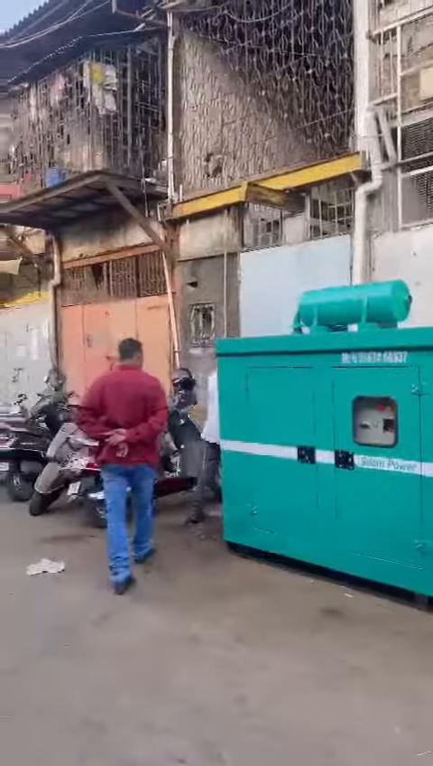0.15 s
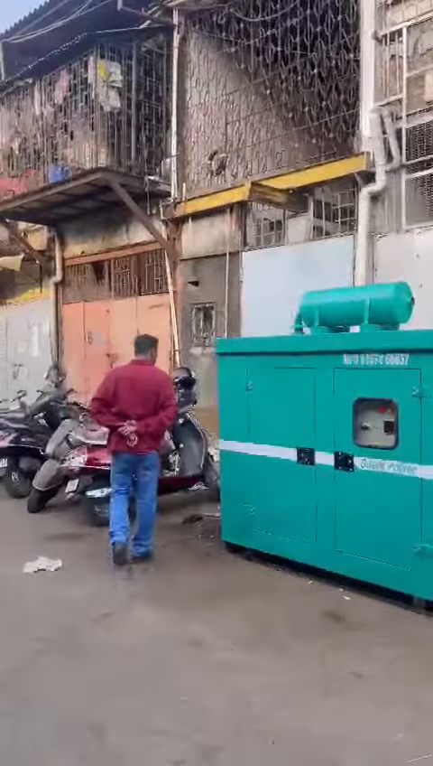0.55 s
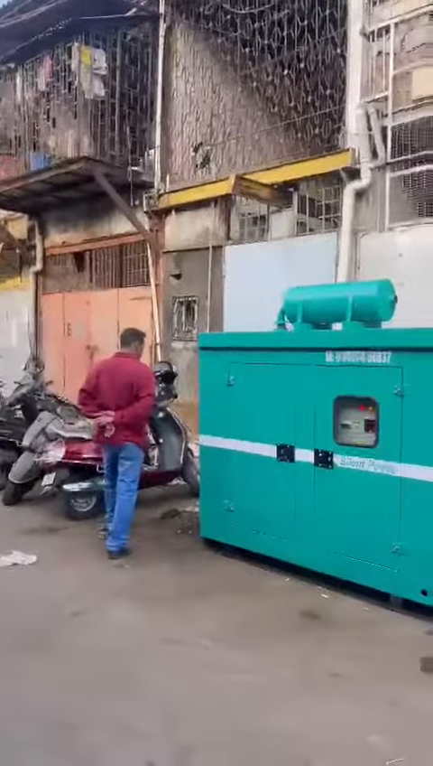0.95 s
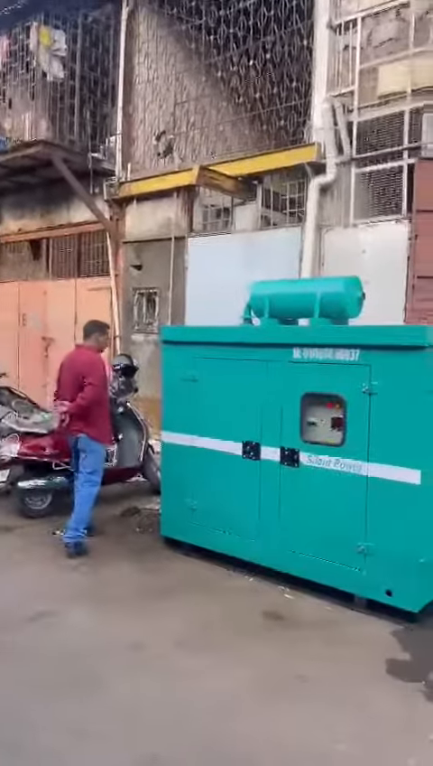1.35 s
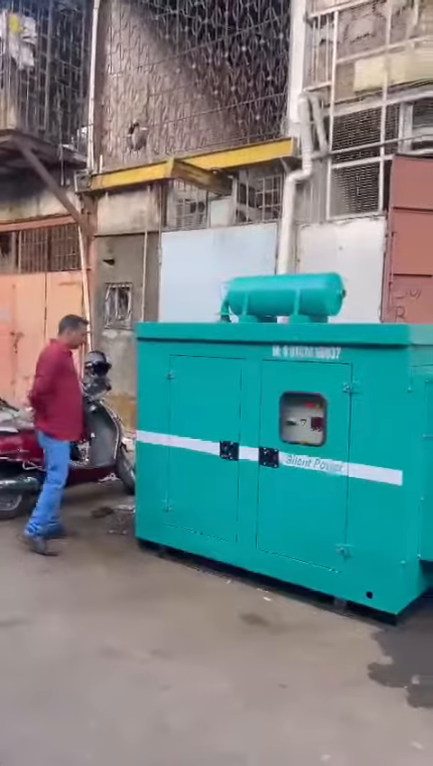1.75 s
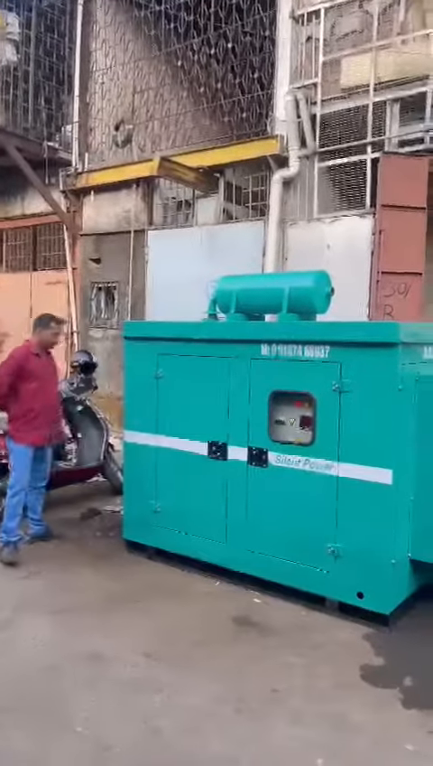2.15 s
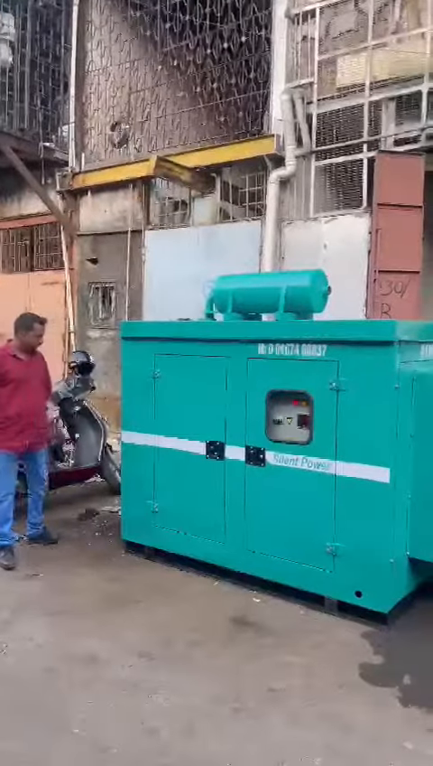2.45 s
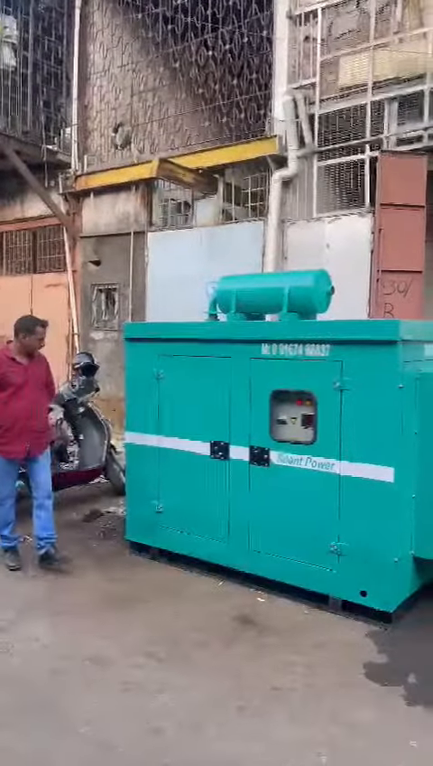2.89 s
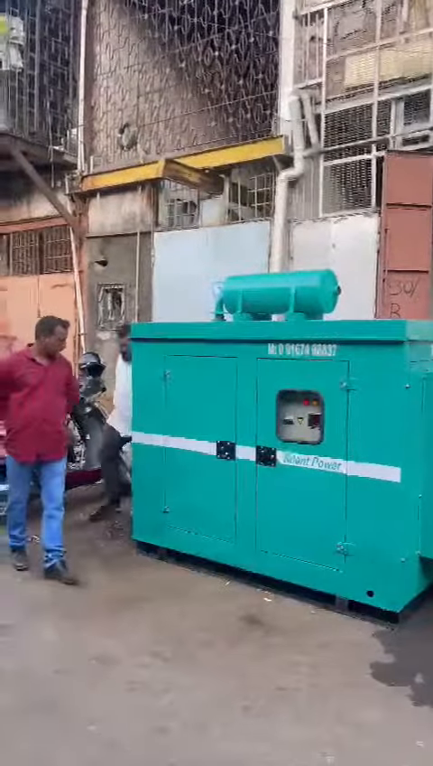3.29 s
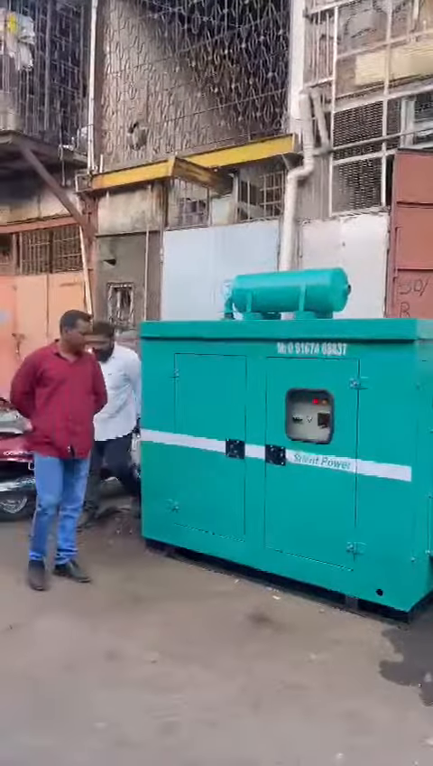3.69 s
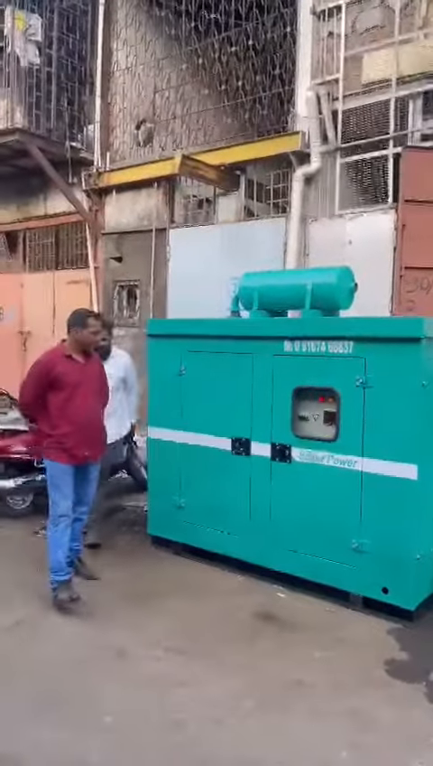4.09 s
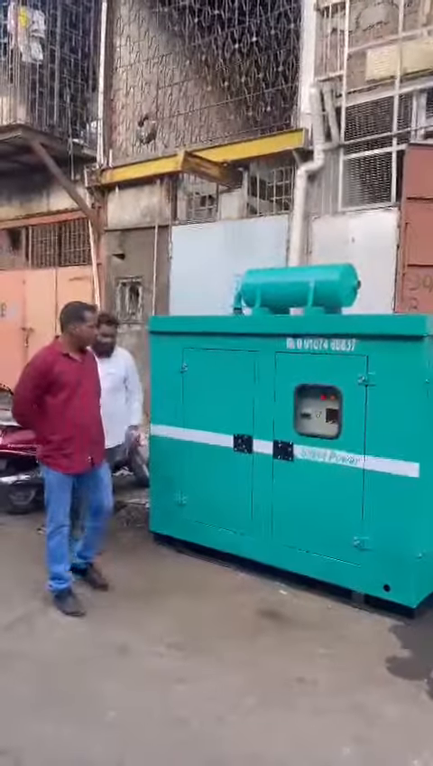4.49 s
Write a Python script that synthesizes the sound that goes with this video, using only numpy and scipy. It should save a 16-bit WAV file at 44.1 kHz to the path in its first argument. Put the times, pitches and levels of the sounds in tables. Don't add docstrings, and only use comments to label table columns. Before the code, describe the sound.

A boxed diesel generator drones a few metres away in an open lane, a low throbbing hum with ringing steel panels, soft clatter and cooling-air hiss. Short gusts thump the phone's microphone, and a thin high whine from afar swells and fades. At about three and a half seconds the engine is shut off; the hum slides down and weakens until the end.

```python
import sys
import numpy as np
from scipy import signal
from scipy.fft import rfft, irfft
from scipy.io import wavfile
from scipy.ndimage import uniform_filter1d

SR = 44100
rng = np.random.default_rng(int(sys.argv[2]) if len(sys.argv) > 2 else 0)


def generate_wav(signal):
    frames = np.transpose(np.atleast_2d(signal))
    scaled = np.clip(frames, -1, 1) * 32767
    pcm = np.round(scaled).astype(np.int16)
    wavfile.write(sys.argv[1], SR, pcm)


def field_ratio(decibels):
    return 10 ** (np.asarray(decibels, dtype=float) / 20)


N = 204303
TIME = np.arange(N) / SR
HZ = np.maximum(np.arange(N // 2 + 1) * SR / N, 1)
CUT_S = 3.46
GOVERNED_HZ = 49.4


def along(table, column):
    rows = np.array(table)
    return np.interp(np.log(HZ), np.log(rows[:, 0]), rows[:, column])


def unit(x):
    return x / np.sqrt(np.mean(x ** 2))


def walk(rate):
    hold = int(SR / rate)
    x = np.repeat(rng.standard_normal(N // hold + 1), hold)
    x = uniform_filter1d(uniform_filter1d(x, hold), hold)[:N]
    return x / x.std()


def bumps(table):
    return sum(db * np.exp(-((TIME - s) / half_width) ** 2) for s, db, half_width in table)


def switch(at_s, rise_s):
    return .5 + .5 * np.tanh((TIME - at_s) / rise_s)


def pair(gain, alike, turns=0, gate=1):
    shared, separate = rfft(gate * rng.standard_normal((2, N)))
    alike = np.clip(alike, -1, 1)
    right = alike * shared * np.exp(-1j * np.pi * turns) + np.sqrt(1 - alike ** 2) * separate
    return unit(irfft(gain * np.array([shared, right]), N))


def pan(x, db):
    return x * field_ratio(np.array([[db / 2], [-db / 2]]))


# frequency in Hz, level in dB per Hz.
WIND_COLOUR = [(12, -54.5), (28, -6.5), (55, 3), (120, 3.5), (260, -12.5), (500, -27), (900, -51)]
# time in seconds, level in dB over the breeze, half width in seconds.
GUST_TIMES = [(.75, 8, .25), (1.5, 18, 0.069), (1.82, 12.5, 0.065), (2.0, 13, 0.18), (2.55, 13, 0.12),
              (2.95, 8.5, .1), (3.23, 7.5, 0.1), (3.57, 8, 0.032), (3.72, 3.5, 0.026), (3.82, 2, 0.036),
              (4.04, 1.5, 0.035), (4.27, 4, .03), (4.52, 6.5, 0.051)]
# time in seconds, level change in dB, half width in seconds.
BACKGROUND_LULLS = [
    (4.46, -8, .022),
]


def wind():
    puffs = field_ratio(np.array([3.5 * walk(30), 3.5 * walk(30)]))
    breeze_db = -43 + 16 * switch(at_s=3.03, rise_s=0.24)
    gust_db = breeze_db + bumps(GUST_TIMES) + bumps(BACKGROUND_LULLS)
    return pair(field_ratio(along(WIND_COLOUR, 1)), 0, gate=puffs) * field_ratio(gust_db + np.array([[-1.5], [4.5]]))


# time in seconds, whine in Hz.
WHINE_PITCH = [(0, 5215), (.45, 5182), (.78, 5112), (.95, 5100), (1.2, 5110), (1.35, 5092), (1.47, 4975),
               (1.78, 5180), (2.1, 5270), (2.35, 5250), (2.55, 5298), (2.72, 5365), (2.86, 5360),
               (3.25, 5270), (3.45, 5247), (3.9, 5267), (4.22, 5260), (4.63, 5215)]
# start in seconds, length in seconds, level in dB.
ECHO_SWELLS = [(-.03, 0.23, -45.5), (.34, 0.049, -62), (0.508, 0.048, -53), (.64, 0.028, -48),
               (0.743, 0.02, -48.5), (0.85, 0.13, -46.5), (1.165, 0.16, -43), (1.396, .02, -49),
               (1.464, .02, -51), (1.59, 0.034, -48), (1.693, 0.12, -44), (1.905, 0.047, -42.5),
               (2.03, 0.17, -42), (2.35, .03, -50), (2.43, 0.045, -43.5), (2.503, 0.071, -46),
               (2.606, 0.27, -36), (2.938, 0.11, -37), (3.107, 0.047, -38.5), (3.209, 0.041, -43),
               (3.294, 0.13, -44), (3.47, 0.027, -50), (3.592, 0.27, -41), (4.008, .24, -40.5),
               (4.3, 0.043, -48.5), (4.47, 0.054, -51)]


def whine():
    pitch = np.interp(TIME, *np.transpose(WHINE_PITCH)) + 2.5 * walk(30)
    phase = 2 * np.pi * np.cumsum(pitch) / SR
    edge_s, arch = 0.027, 2.26
    size = field_ratio(-55.5)
    for start_s, length_s, db in ECHO_SWELLS:
        across = (TIME - start_s - length_s / 2) / (length_s / 2 + edge_s)
        size = size + field_ratio(db) * np.clip(1 - across ** 2, 0, 1) ** (1 / arch)
    pan_db = -3.5 + 0.5 * TIME
    flutter = field_ratio(1.5 * np.array([walk(28), walk(28)]) + 2.2 * walk(45))
    tones = np.array([np.sin(phase), np.sin(phase + 1.15 + .3 * walk(4.9))])
    return np.sqrt(2) * size * flutter * field_ratio(np.array([pan_db, -pan_db]) / 2) * tones


def layer_db(law, step, speed):
    steady_db, step_db, cut_db, halving_db = law
    return steady_db + step_db * step + cut_db * switch(at_s=3.51, rise_s=0.12) - halving_db * np.log2(speed)


# frequency in Hz, level in dB per Hz.
HISS_COLOUR = [(1500, -12), (3000, -14.5), (4500, 3.5), (6000, -3), (7500, -3), (9000, -1.9), (10500, -1),
               (11300, -3.5), (11750, -10.5), (11900, -43)]
# frequency in Hz, half turns the right port lags, likeness of the ports 0 to 1.
HISS_DELAY = [(3000, -.5, .3), (4000, .5, .5), (4550, .95, .8), (5050, 1.08, .87), (5400, 1.7, .95),
              (6150, 2, .99), (7250, 2.5, .99), (8000, 2.85, .99), (8950, 3, .99), (10000, 3.15, .99),
              (10750, 3.5, .99), (11700, 4, .99)]
# steady level in dB, dB gained by the sideways step, dB added at the cut, dB gained per halving of
HISS_LEVEL = (-46, 0.17, -1.5, -0.5)


def louvres(step, speed):
    hiss = pair(field_ratio(along(HISS_COLOUR, 1)), along(HISS_DELAY, 2), along(HISS_DELAY, 1))
    return hiss * field_ratio(layer_db(HISS_LEVEL, step, speed) + 8 + 0.69 * walk(10))


# frequency in Hz, likeness (-1 to 1).
PORT_LIKENESS = [(50, 0.81), (250, 0.98), (380, 0.48), (550, -.1), (1400, 0.06), (1800, 0.32), (2300, 0.16),
                 (4000, -.1)]
# frequency in Hz, level in dB per Hz.
RUMBLE_COLOUR = [(15, -34.5), (30, 15.5), (45, -7), (70, -1.5), (130, -4), (240, -1), (320, -8.5),
                 (450, -11.5), (700, -50.5)]
CLATTER_COLOUR = [(300, -39), (500, 1), (780, -1.5), (915, -3), (1080, -2.5), (1330, -4.5), (1800, -8.5),
                  (3000, -10), (4500, -20), (6000, -36)]
# frequency in Hz, width in Hz, level in dB.
PANEL_RINGS = [(353.7, 18, -1), (502, 25, -9.5), (605, 13.7, -0.5), (636.3, 18, 0.3), (923, 23, -6.5),
               (1324, 63, -12), (1486, 102, -16)]
# steady level in dB, dB gained by the sideways step, dB added at the cut, dB gained per halving of
RUMBLE_LEVEL = (-23, -1, -1, -2.5)
PANEL_LEVEL = (-31, -2, 0.5, -10)
CLATTER_LEVEL = (-36.5, 2.5, -4.5, 1)
# time in seconds, level in dB, half width in seconds.
RUMBLE_SWELLS = [
    (0.457, 9, 0.033),
    (1.77, -3.5, 0.1),
    (1.6, -2.5, .08),
    (.36, -6.5, 0.11),
    (0.088, -1.5, 0.073),
]
PANEL_SWELLS = [
    (1.55, 5.5, 0.57),
    (2.88, 4, 0.19),
    (3.55, 0.5, 0.049),
]
CLATTER_SWELLS = [
    (3.22, 1.5, 0.25),
    (1.83, 1.5, 0.09),
]


def casing(phase, step, speed):
    rumble_db = layer_db(RUMBLE_LEVEL, step, speed) + bumps(RUMBLE_SWELLS) + bumps(BACKGROUND_LULLS)
    panel_db = layer_db(PANEL_LEVEL, step, speed) + bumps(PANEL_SWELLS)
    clatter_db = layer_db(CLATTER_LEVEL, step, speed) + bumps(CLATTER_SWELLS)
    beat = 1 + .06 * np.cos(phase) + .12 * np.cos(phase / 4) + .07 * np.cos(phase / 2)
    alike = along(PORT_LIKENESS, 1)
    rings = sum(field_ratio(db) / np.abs(1 + 2j * (HZ - f) / width) ** 1.34 for f, width, db in PANEL_RINGS)
    rumble = pair(field_ratio(along(RUMBLE_COLOUR, 1)), alike) * field_ratio(rumble_db)
    panels = pair(rings, alike, gate=beat) * field_ratio(panel_db - 1 + 0.17 * walk(8))
    clatter = pair(field_ratio(along(CLATTER_COLOUR, 1)), alike, gate=beat)
    clatter = clatter * field_ratio(clatter_db + 4.5 + 0.12 * walk(8.9))
    return pan(rumble, 1.5) + pan(panels, 3) + pan(clatter, -1.8)


def firing_rate():
    after = np.maximum(TIME - CUT_S, 0)
    fall_hz_per_s = 29 * (1 - np.exp(-after / .12)) * np.exp(-.42 * after)
    surge_hz = 1.3 * np.exp(-((TIME - CUT_S) / 0.085) ** 2)
    return GOVERNED_HZ - np.cumsum(fall_hz_per_s) / SR + surge_hz


# frequency in Hz, gain in dB.
SILENCER_GAIN = [(29, -52), (37, -22), (47, -18), (64, -15), (79, -19), (97, -13), (118, -29.5),
                 (150, -33.5), (200, -35.5)]
FUELLED_DB = [-1.7, -0.12, -0.71, -0.5]
SIDESTEP_DB = [1.5, -2]


def order_levels(hz, step):
    f, gain_db = np.transpose(SILENCER_GAIN)
    unfuelled_db = [3.5, -5, -7.5, -8]
    dry = 1 - np.exp(-np.maximum(TIME - CUT_S, 0) / 0.45)
    levels = []
    for k in range(4):
        passed_db = np.interp(np.log((k + 1) * hz), np.log(f), gain_db)
        levels.append(passed_db + FUELLED_DB[k] + unfuelled_db[k] * dry)
    levels[0] = levels[0] + SIDESTEP_DB[0] * step
    levels[1] = levels[1] + SIDESTEP_DB[1] * step
    return levels


# multiple of firing rate, level in dB, left minus right in dB.
WEAK_ORDERS = [(.75, -38, 0), (1.25, -31, .4), (2.25, -35, 1), (2.5, -36, 1), (3.5, -40, 1), (3.75, -38, 1),
               (5, -38, 1), (7, -43, 3)]
# time in seconds, level change in dB, half width in seconds.
EXHAUST_DIPS = [
    (3.85, -6, 0.012),
    (3.97, -4, 0.03),
    (4.465, -15, 0.018),
]


def exhaust(phase, hz, step):
    first_db, second_db, third_db, fourth_db = order_levels(hz, step)
    speed = hz / hz.max()
    out = pan(field_ratio(first_db + 1.8 + 0.24 * walk(20)) * np.cos(phase), .3)
    out += pan(field_ratio(second_db + 1.28 + 0.52 * walk(41)) * np.cos(2 * phase), 1.8)
    third = field_ratio(third_db - 0.7 + 9.5 * speed ** 6 * walk(6.4)) * np.cos(3 * phase + 0.19 * walk(7.7))
    fourth = field_ratio(fourth_db - 1.5 + 3.4 * walk(1.2)) * np.cos(4 * phase + 1.2 * walk(8.2))
    out += pan(third + fourth, 1.1)
    for order, db, pan_db in WEAK_ORDERS:
        wobble = rng.uniform(0, 2 * np.pi) + 1.43 * walk(7)
        out += pan(field_ratio(db + 1.8 * walk(7.6)) * speed ** 2.3 * np.cos(order * phase + wobble), pan_db)
    return np.sqrt(2) * out * field_ratio(bumps(EXHAUST_DIPS))


def scene():
    hz = firing_rate()
    phase = 2 * np.pi * np.cumsum(hz) / SR
    speed = hz / GOVERNED_HZ
    step = np.clip((TIME - 0.96) / (2.15 - 0.96), 0, 1)
    background = wind() + whine()
    engine = louvres(step, speed) + casing(phase, step, speed) + exhaust(phase, hz, step)
    return background + engine


# frequency in Hz, level in dB.
SILENCE_BELOW = [(40, -19), (100, -27), (150, -17), (600, -12), (2500, -5), (3500, -4.5), (5000, -6),
                 (11500, -1.5)]


def starve(x):
    frame, top_hz = 2048, 11700
    pad = frame - 688
    mid_side = np.pad(np.array([x[0] + x[1], x[0] - x[1]]), ((0, 0), (pad, 0))) / 2
    hz, _, z = signal.stft(mid_side, SR, "cosine", frame)
    edges = np.r_[0:40:4, 40:96:8, 96:144:12, 144, 160, 176, 196, 216, 240, 264, 292, 320:len(hz):32]
    width = np.diff(np.r_[edges, len(hz)])
    power = np.abs(z) ** 2
    log_power = np.log(power.sum(axis=0) + 1e-18)
    typical = np.exp(np.add.reduceat(log_power, edges, axis=0) / width[:, None])
    band = np.repeat(typical * field_ratio(4.5 * rng.standard_normal(typical.shape)), width, axis=0)
    rows = np.array(SILENCE_BELOW)
    limit = field_ratio(2 * np.interp(np.log(hz + 20), np.log(rows[:, 0]), rows[:, 1]))
    smooth_power = uniform_filter1d(power, size=5, axis=1)
    keep = (smooth_power > limit[:, None] * band) & (hz < top_hz)[:, None]
    mid, side = signal.istft(z * keep, SR, "cosine", frame)[1][:, pad:pad + N]
    return np.array([mid + side, mid - side])


def top_cut(x):
    return signal.sosfilt(signal.butter(12, 12990, fs=SR, output="sos"), x)


def record(dry):
    low_cut = signal.butter(3, 38, "high", fs=SR, output="sos")
    cut = signal.sosfiltfilt(low_cut, dry)
    rounded = np.tanh(0.82 * cut) / 0.82
    return top_cut(starve(rounded))


dry = scene()
out = record(dry)
generate_wav(out)
```